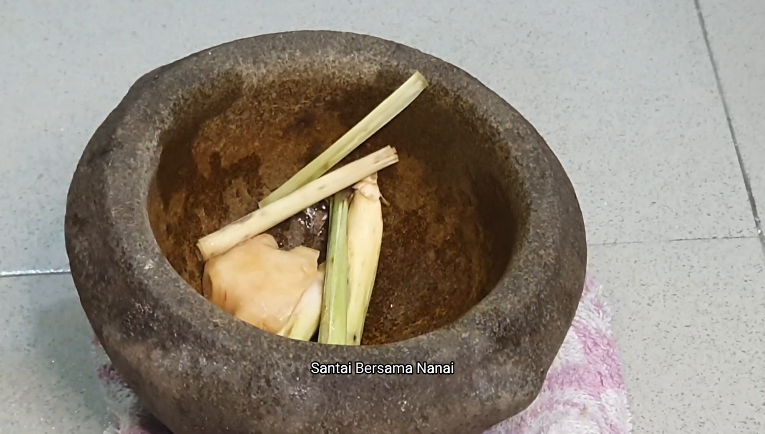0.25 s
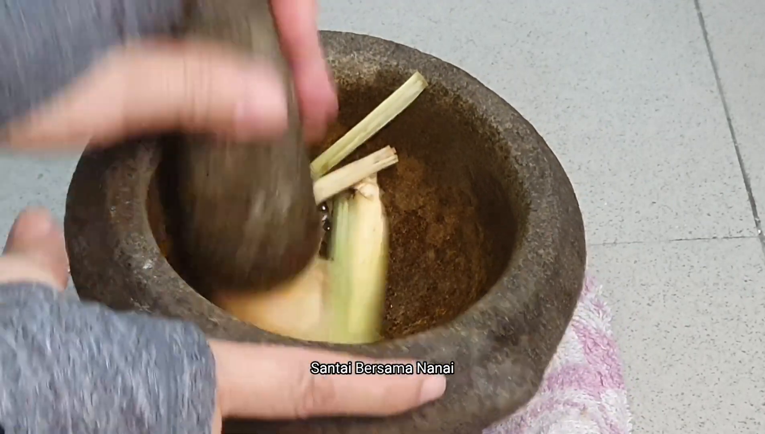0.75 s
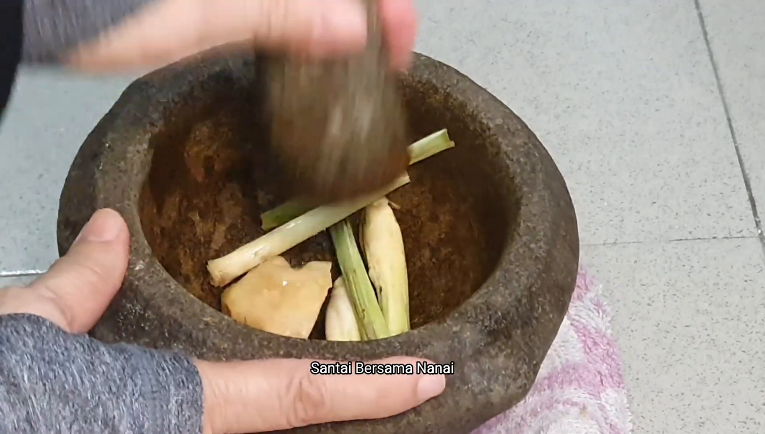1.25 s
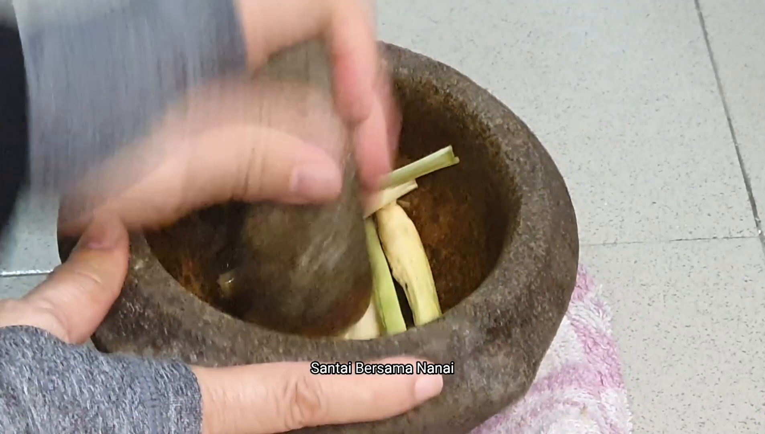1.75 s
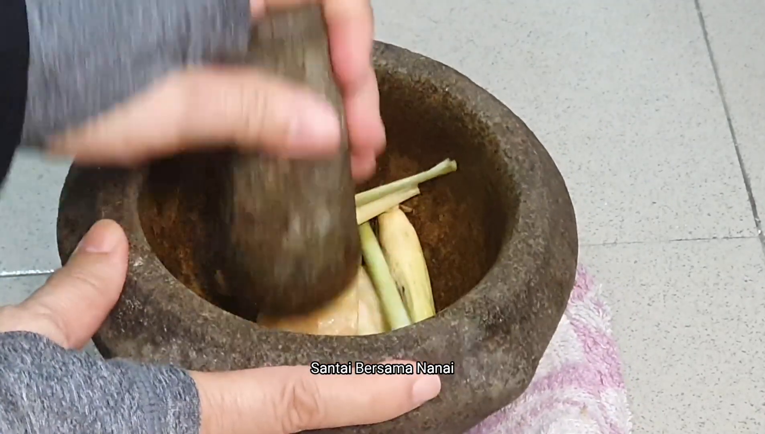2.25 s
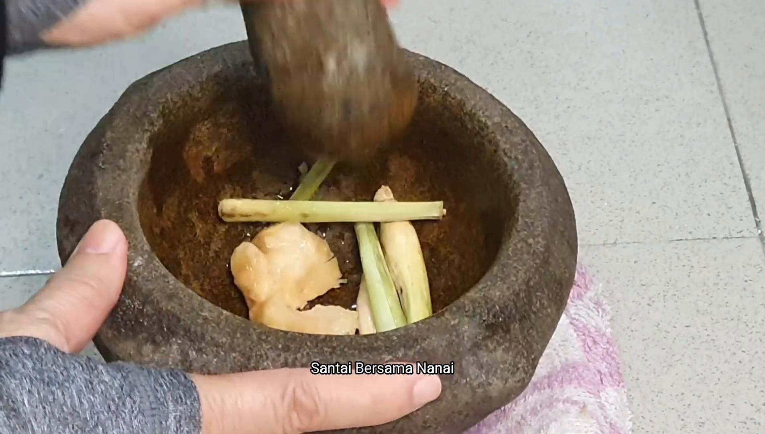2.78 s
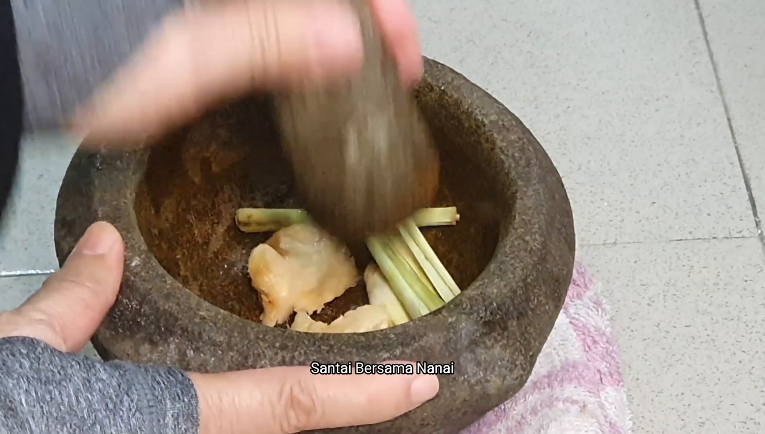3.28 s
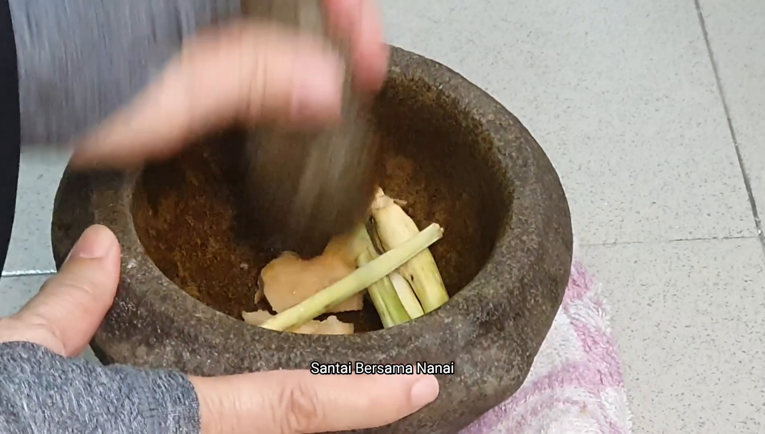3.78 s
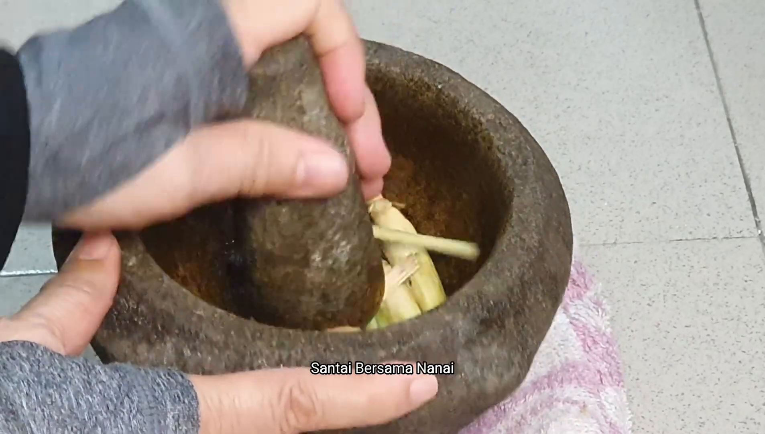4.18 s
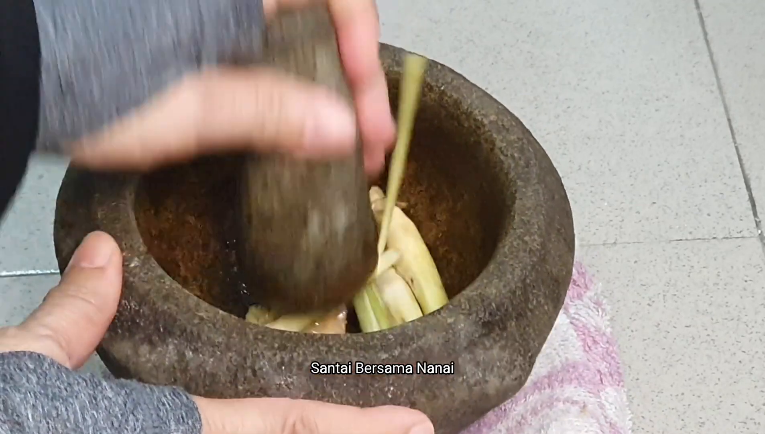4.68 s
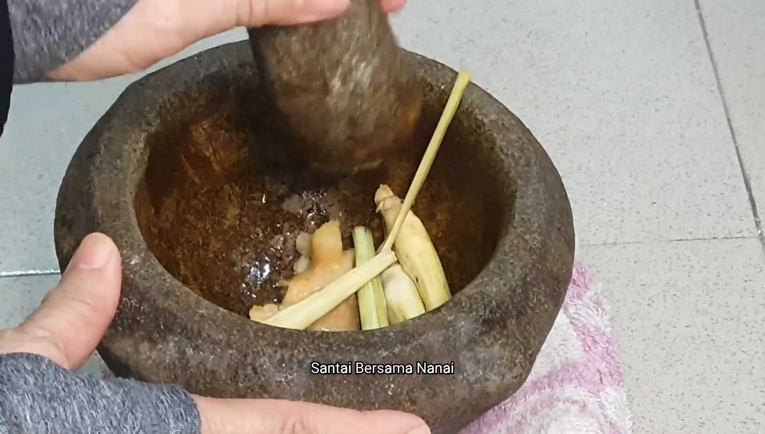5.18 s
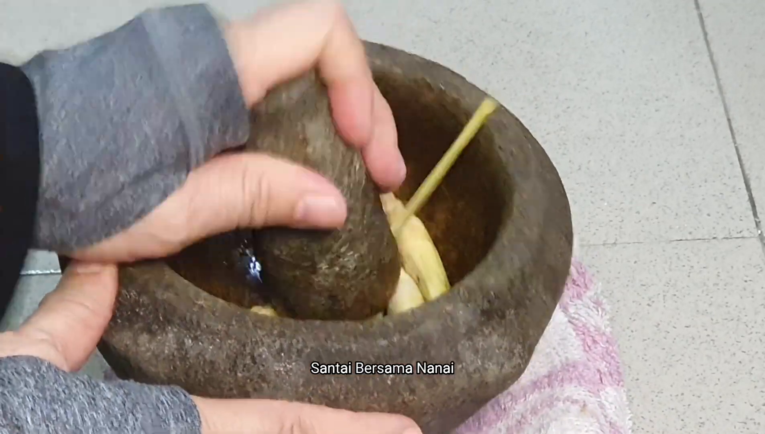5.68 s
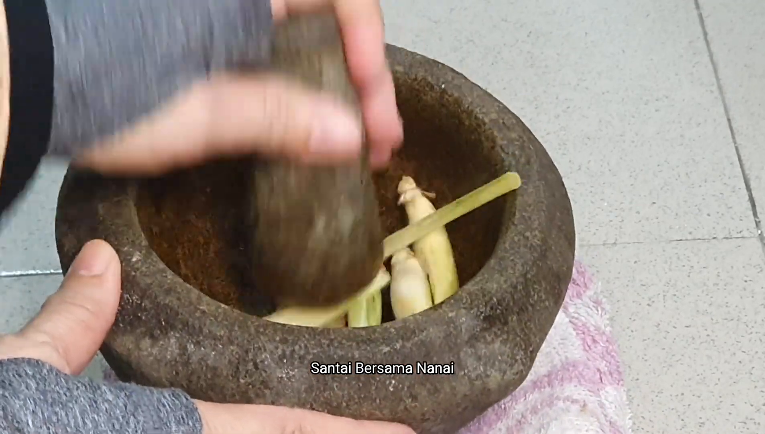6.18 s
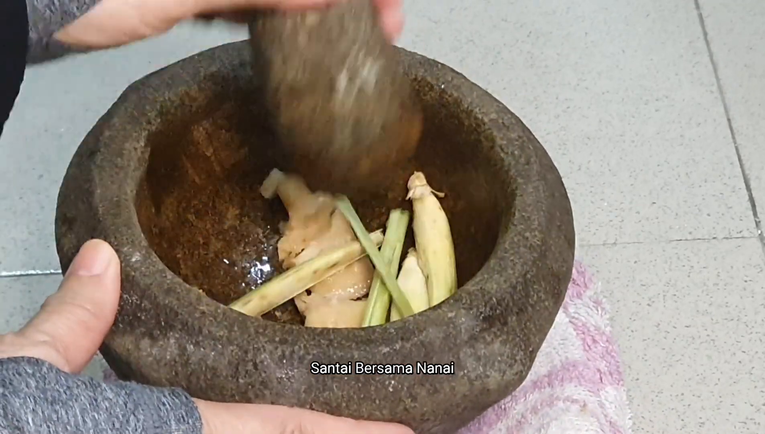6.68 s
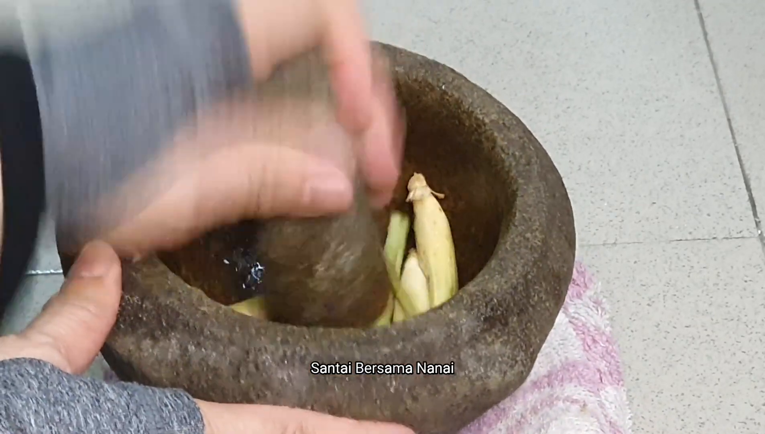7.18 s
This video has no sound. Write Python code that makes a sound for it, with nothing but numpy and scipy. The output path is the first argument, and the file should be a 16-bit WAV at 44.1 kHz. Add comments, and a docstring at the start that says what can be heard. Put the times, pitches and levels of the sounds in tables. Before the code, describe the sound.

A heavy stone pestle pounds fibrous ginger and lemongrass in a stone mortar, soft damp crunches and a few sharp loud knocks over low hum.

```python
"""A low rumble, a hum of appliances and a soft wash come first; then a stone pestle pounds ginger and lemongrass.
The blows land in a stone mortar on a tiled kitchen floor: each is a cluster of clicks as fibres are crushed.
Where stone meets stone, a short knock sets off dying sines: bowl, rim, pestle and the gap under it.
The hard room answers with wall echoes and a fading tail; two microphones a hand apart hear it all.
The background is shaped noise and steady tones; a limiter holds down the hardest knocks."""
import sys
import numpy as np
from scipy import signal
from scipy.fft import rfft, irfft
from scipy.io import wavfile
from scipy.ndimage import uniform_filter1d, minimum_filter1d

SR = 44100
rng = np.random.default_rng(int(sys.argv[2]) if len(sys.argv) > 2 else 0)


def digitize_waveform(pressure):
    """Quantize a signal to 16-bit integers and store it at the path in sys.argv[1].

    Rows of a 2-D input are taken as channels; values are limited to [-1, 1].
    """
    field = np.atleast_2d(pressure).T
    bounded = np.clip(field, -1, 1)
    quanta = np.round(bounded * 32767).astype(np.int16)
    wavfile.write(sys.argv[1], SR, quanta)


N = 328545
BLOW_SIZE = 4096  # samples in the sound of one blow
LEAD_S = 0.03  # swell ahead of each blow


def gain_of(db):
    """Turns decibels into an amplitude factor."""
    return 10 ** (np.asarray(db) / 20)


def to_unit_rms(x):
    """Scales a sound so that its average strength (rms) is 1."""
    return x / np.sqrt(np.mean(x ** 2) + 1e-20)


def read(points, hz):
    """Reads a table at hz, drawing straight lines on a log-frequency axis."""
    point_hz, value = np.transpose(points)
    return np.interp(np.log(hz + 1), np.log(point_hz + 1), value)


def add(mix, start_s, sound):
    """Mixes a sound in at a start time."""
    part = mix[:, round(start_s * SR):][:, :sound.shape[1]]
    part += sound[:, :part.shape[1]]


def partly_alike(left, other, likeness):
    """Makes a right side that shares the given part of the left one, per frequency."""
    same = np.clip(likeness, -1, 1)[:, None]
    return same * left + np.sqrt(1 - same ** 2) * other


def ring(hz, t60, db, t):
    """A dying sine: it loses 60 dB in t60 seconds."""
    return gain_of(db - 60 * t / t60) * np.sin(2 * np.pi * hz * t)


def struck(modes, t):
    """Sum of dying sines; neighbouring modes start in opposite directions."""
    return sum((-1) ** k * ring(hz, t60, db, t) for k, (hz, t60, db) in enumerate(modes))


def fuzzy_tone(hz, width):
    """Slow noise moved up to a pitch gives a wavering tone, rms 1; more width [Hz] is fuzzier."""
    slow = rng.standard_normal(N) + 1j * rng.standard_normal(N)
    r = np.exp(-np.pi * width / SR)
    for _ in range(2):
        slow = signal.lfilter([1], [1, -r], slow)
    carrier = np.exp(2j * np.pi * hz * np.arange(N) / SR)
    return to_unit_rms((slow * carrier).real)


# How the background drifts, for the wash and the hum:
# (time [s], swell of rumble and low wash before its follow factor [dB], hum level [dB],
#  third harmonic level [dB])
BACKGROUND_DRIFT = [(0.0, -1.5, -50.5, -59.5), (1.04, 0.5, -55, -63.5), (1.16, 3, -50, -58.5),
                    (1.41, -2.5, -71, -62.5), (1.66, 7, -52.5, -59.5), (1.82, 4, -38.5, -53.5),
                    (1.95, 9, -63, -49.5), (2.09, 0.5, -49, -56.5), (2.68, 1, -61.5, -58.5),
                    (2.9, 1, -50, -56), (3.67, -2, -48, -56), (3.98, -6, -62.5, -56.5),
                    (4.2, -2.5, -48, -57), (4.38, -4, -49, -62.5), (5.52, -0.5, -47, -53.5),
                    (7.16, -2, -51.5, -56), (7.3, -2.5, -56.5, -60), (7.45, -0.5, -64, -60)]
# Colour of the wash: (frequency [Hz], relative level per Hz [dB])
WASH_COLOUR = [(20, -30), (40, -26.5), (90, -5), (140, -14), (240, -16), (350, -11.5), (480, -14.5),
               (700, -14.5), (1100, -16), (1500, -22), (3260, -34), (7480, -49), (10000, -60), (12200, -68)]
# How alike the wash is at both microphones: (frequency [Hz], left-right likeness [-1 to 1])
WASH_LIKENESS = [(40, .97), (130, .88), (270, .61), (580, -.1), (1230, -.35), (2610, -.08), (5540, .02),
                 (11800, -.04)]
WASH_DB, WASH_FOLLOW = -48, 0.77  # rms level over both sides; share of the swell


def air():
    """Steady wash of the house: coloured noise, alike at both microphones only in the bass; its lows swell."""
    frames, hz = N // 256 + 5, np.fft.rfftfreq(1024, 1 / SR)
    a, b, c, d, patches = rng.standard_normal((frames, 513, 5)).T
    # blurred noise: patches of time and pitch a little louder or softer
    patches = to_unit_rms(uniform_filter1d(uniform_filter1d(patches, 12, 0), 14, 1))
    left = a + 1j * b
    z = np.array([left, partly_alike(left, c + 1j * d, read(WASH_LIKENESS, hz))])
    drift_s, drift_db = np.transpose(BACKGROUND_DRIFT)[:2]
    swell_db = WASH_FOLLOW * np.interp(np.arange(frames) * 256 / SR, drift_s, drift_db)
    low_swell_db = swell_db / (1 + (hz[:, None] / 500) ** 4)
    z *= gain_of(read(WASH_COLOUR, hz)[:, None] + 1.2 * patches + low_swell_db)
    wash = signal.istft(z, nperseg=1024, noverlap=768)[1][:, :N]
    return gain_of(WASH_DB) * to_unit_rms(wash)


# Peaks of the rumble: (frequency [Hz], width [Hz], relative level [dB])
RUMBLE_PEAKS = [(44, 9.2, 1), (70.2, 12, 2)]
HUM_HZ = 99.96
RUMBLE_DB, RUMBLE_FOLLOW = -53.5, 0.85  # level before the swell; share of the swell


def hum():
    """A wavering mains hum, its clean third harmonic, two fainter tones and a lumpy rumble below."""
    t = np.arange(N) / SR
    drift_s, *columns = np.transpose(BACKGROUND_DRIFT)
    swell_db, first_db, third_db = (np.interp(t, drift_s, c) for c in columns)
    rumble = to_unit_rms(sum(gain_of(db) * fuzzy_tone(hz, width) for hz, width, db in RUMBLE_PEAKS))
    rumble = rumble * gain_of(RUMBLE_DB + RUMBLE_FOLLOW * swell_db)
    tone = np.sqrt(2) * np.sin(2 * np.pi * HUM_HZ * t)
    first = gain_of(first_db) * to_unit_rms(tone + 0.42 * fuzzy_tone(97, 10))
    third = gain_of(third_db) * np.sqrt(2) * np.sin(2 * np.pi * 3 * HUM_HZ * t)
    faint = gain_of(-63.5) * fuzzy_tone(240, 4.4) + gain_of(-67.0) * fuzzy_tone(200, 2.3)
    # the hum reaches the microphones unevenly
    apart = gain_of(first_db - 9.5) * fuzzy_tone(90, 30) * [[1], [-1]]
    low = (rumble + first) * gain_of([[-0.3], [0.3]])
    return apart + low + third * gain_of([[0.4], [-0.4]]) + faint


# Wall echoes: (delay [s], left level [dB], right level [dB])
WALL_ECHOES = [(.0104, -8, -11), (.0132, -12, -14), (.021, -17, -17), (.0305, -13, -14)]
# How long the room's tail lasts: (frequency [Hz], time to fall 60 dB [s])
TAIL_TIMES = [(300, 0.44), (1000, 0.58), (2000, 0.44), (4000, 0.52), (7000, 0.38), (11000, 0.41)]
# How alike the tail is on both sides: (frequency [Hz], left-right likeness [-1 to 1])
TAIL_LIKENESS = [(130, .85), (300, 0.52), (600, 0.24), (1100, -0.5), (2300, -0.22), (5000, -.05),
                 (11800, 0.096)]


def kitchen():
    """Reply of the hard room: a few wall echoes over sparse random taps that die band by band."""
    size = SR * 3 // 4
    taps = np.zeros((2, size))
    # one tap, up or down, at a random place in every 12 samples
    at = np.arange(0, size - 12, 12) + rng.integers(0, 12, (2, (size - 1) // 12))
    np.put_along_axis(taps, at, rng.choice([-1., 1.], at.shape), 1)
    hz, t, z = signal.stft(taps, SR, nperseg=256)
    z[1] = partly_alike(z[0], z[1], read(TAIL_LIKENESS, hz))
    z = z * gain_of(-60 * t / read(TAIL_TIMES, hz)[:, None])
    tail = signal.istft(z, SR, nperseg=256)[1][:, :size]
    tail *= np.clip((np.arange(size) / SR - 0.003) / 0.0039, 0, 1)  # reflections thicken
    tail *= gain_of([[-0.5], [-1.5]]) / np.linalg.norm(tail[0])
    for delay_s, left_db, right_db in WALL_ECHOES:
        tail[:, round(delay_s * SR)] += gain_of([left_db, right_db])
    return tail


# The mortar shoved against the cloth:
# (frequency [Hz], time to fall 60 dB [s], relative level at the microphones [dB], into the room [dB])
THUD_MODES = [(430, 0.0081, 4, 5), (169, 0.018, -23, -32)]
THUD_DB = -23.5  # relative to the knock


def cloth_thud(knock_db, column, after):
    """The shoved mortar gives a low thud: dying sines that grow with the knock."""
    return struck([(m[0], m[1], m[column] + THUD_DB + knock_db) for m in THUD_MODES], after)


# The hollow of the bowl, which damps fast:
# (factor on bowl pitch, time to fall 60 dB [s], relative level [dB])
BOWL_MODES = [(1.034, 0.0083, -0.95), (1.37, 0.0024, -2.5), (0.21, 0.017, -21), (1.44, 0.0073, -19),
              (0.97, 0.035, -18.5), (0.585, 0.0074, -12), (0.775, 0.0056, -14)]
# The rim: (frequency [Hz], time to fall 60 dB [s], relative level at the microphones [dB],
#  into the room [dB])
RIM_MODES = [(939, 0.052, -21, -13), (1041, 0.041, -24, -8.5), (1079, 0.042, -35.5, -15.5),
             (848, 0.049, -24.5, -14.5), (623, 0.017, -15, -13), (1154, 0.048, -33, -15)]
# The pestle: (frequency [Hz], time to fall 60 dB [s], relative level at the microphones [dB],
#  into the room [dB])
PESTLE_MODES = [(3610, 0.0078, -9.5, -12), (3944, 0.059, -20.5, -13), (4040, 0.042, -22, -16),
                (4340, 0.0096, -17, -11.5), (4450, 0.0038, -11, -14.5)]
LOW_BOWL_FOLLOW = 0.33  # the low modes of the bowl wake with the rim
GAP_HZ, GAP_T60_S = 3140, 0.0096
GAP_STRUCK_DB = (-11, -19.5)  # the knock rings the gap too: at the microphones, into the room


def stone_ring(bowl_hz, rim_db, pestle_db, gap_db, column, t):
    """Ring of the bowl, rim, pestle and the gap under it: each stone shakes in several dying sines."""
    bowl = [(bowl_hz * factor, t60, db + (factor < 0.8) * LOW_BOWL_FOLLOW * rim_db)
            for factor, t60, db in BOWL_MODES]
    stones = struck(bowl, t)
    stones += struck([(m[0], m[1], m[column] + rim_db) for m in RIM_MODES], t)
    stones += struck([(m[0], m[1], m[column] + pestle_db) for m in PESTLE_MODES], t)
    return stones - ring(GAP_HZ, GAP_T60_S, GAP_STRUCK_DB[column - 2] + gap_db, t)


# Colour of the snapping fibres: (frequency [Hz], relative level [dB])
FIBRE_COLOUR = [(300, -11.5), (1000, -7.5), (2200, -5.5), (3500, 2.5), (6000, 8), (8000, 5), (10500, -3),
                (12000, -21)]
EVENED_SHARE = 0.55  # of the crunch that reaches the walls, as a share of power


def crunch(length, tilt_db, rise, gap_db):
    """Fibres snap in uneven clicks that swell and thin out; the gap colours them. Rows: near, into the room."""
    t = np.arange(BLOW_SIZE) / SR - LEAD_S
    # a quick rise plus a slower, fainter one before the peak
    swell = 0.46 * np.exp(t / max(rise, 0.0003)) + 0.13 * np.exp(t / 0.0061)
    shape = np.where(t < 0, swell, np.exp(-t / max(length, 0.0005)))
    snaps = rng.standard_normal(BLOW_SIZE) * gain_of(1.56 * rng.exponential(1, BLOW_SIZE))
    hz = np.fft.rfftfreq(BLOW_SIZE, 1 / SR)
    colour = gain_of(read(FIBRE_COLOUR, hz) + tilt_db * np.log2((hz + 1500) / 8000))
    colour *= 1 + gain_of(gap_db) * 6 / (1 + ((hz - GAP_HZ) / 230) ** 2)
    # over all directions the snaps even out towards their mean colour: one coloured click
    click = np.arange(BLOW_SIZE) == round(LEAD_S * SR)
    sound = irfft(rfft([snaps * shape, click]) * colour)
    # both get the energy of 300 samples at rms 1
    near, even = sound / np.sqrt(np.mean(sound ** 2, 1, keepdims=True) * BLOW_SIZE / 300)
    return np.array([near, np.sqrt(EVENED_SHARE) * even + np.sqrt(1 - EVENED_SHARE) * near])


# Every blow of the pestle:
# (time [s], knock level before a fixed boost [dB], crunch level [dB], bowl pitch [Hz],
#  relative rim ring [dB], relative pestle ring [dB], crunch fade time constant [s],
#  crunch tilt [dB per doubling of frequency + 1500 Hz], relative gap ring [dB], room share [dB])
PESTLE_BLOWS = [(0.9645, -46, -52.5, 2067, -2, -18, 0.0055, -4, -25, -2),
                (1.285, -38, -52.5, 2000, 5, -28, 0.0044, 0, 1, -5.5),
                (1.6192, -34, -35, 2080, 8.5, -17, 0.0046, 4, 0, -6),
                (1.9665, -36, -35, 1860, 9, -7, 0.003, -3, -10, -3),
                (2.3245, -30.5, -29, 2240, 4.5, -0.5, 0.0018, 4.5, -18, -6.5),
                (2.7102, -22.5, -27, 1950, 3.5, -23, 0.0034, -6.5, -10, -5),
                (3.1186, -29.5, -34, 1970, 3, -43, 0.0033, -3, -13, -5.5),
                (3.562, 3.5, -13, 2040, 1.5, -3.5, 0.00084, -10.5, -8, -3.5),
                (4.014, -49, -58.5, 2180, -20, 3, 0.0066, 14, -11, 3.5),
                (4.045, -2.5, -82, 1934, 0.5, -16, 0.003, -7, -14, -11),
                (4.3455, -45, -53, 1970, -8, -15, .0031, -2, -12, -9),
                (4.3524, -57, -50.5, 2180, 0, -17, 0.0051, 2.5, -1.5, -2),
                (4.3588, -42.5, -57, 1890, -11, -17, 0.0047, 15, 0.1, -10),
                (4.7227, -46, -52, 1970, -12, -10, 0.0057, 3, -2, 3.5),
                (4.7292, -46, -44.5, 1940, -6, -11, 0.006, -2.5, -26, -12),
                (5.1103, -45, -40.5, 2080, -8, -18, 0.01, -1.5, -12, -5.5),
                (5.4943, -22.5, -30, 1930, 2.5, -32, 0.005, -0.5, -32, -6.5),
                (5.8725, -44, -47, 1950, -17, -25, 0.0035, -3, 4, -1),
                (5.8798, -29.5, -33, 1770, -15, -45, 0.0038, 0, -5.5, -4.5),
                (6.2667, -48, -51, 2100, -8, -7, .0024, -4, -11, 2),
                (6.2754, -43, -42.5, 1840, -6, -2, 0.0039, -5.5, -29, -2),
                (6.602, -48, -57, 1980, -12, -23, .003, -3, -9, 8),
                (6.618, -51, -49, 1780, -8, -20, .0033, -3, -15, 0),
                (6.652, 1.5, -25.5, 2027, -4, -0.5, 0.0047, -12.5, -10, -7.5),
                (7.0285, -38, -48.5, 1870, -13, -15, 0.0071, 2, 1.5, -3.5),
                (7.399, -29.5, -34.5, 1900, -17, -20, 0.0034, 7.5, -2, -6)]
RISE_SHARE = 0.51  # time constant of the crunch's quick rise, as a share of its fade
PAN_DB, PAN_PER_KNOCK_DB = 2.5, -0.1375  # hard knocks sound nearer the middle, soft ones from the left


def pounding():
    """Every blow: crunch, grating and a knock that rings the stones, heard straight and through the room."""
    mix, rooms = np.zeros((2, N)), [kitchen() for _ in range(4)]
    t = np.arange(BLOW_SIZE) / SR
    after = np.maximum(t - LEAD_S, 0)
    small = signal.butter(3, 800, "high", fs=SR, output="sos")  # objects this small radiate no bass
    strike = np.arange(BLOW_SIZE) == round((LEAD_S - 0.0007) * SR)
    for k, blow in enumerate(PESTLE_BLOWS):
        time_s, knock_db, crunch_db, bowl_hz, rim_db, pestle_db, length, tilt_db, gap_db, wet_db = blow
        # the stones touch too long to ring high; a blow that rings the pestle is the briefer one
        contact_hz = np.clip(5113 + 45 * pestle_db, 3000, 8000)
        contact = signal.butter(6, contact_hz, fs=SR, output="sos")
        fibres = gain_of(crunch_db) * crunch(length, tilt_db, RISE_SHARE * length, gap_db)
        # snaps shake the stone too
        push = gain_of(knock_db + 4.0) * strike + gain_of(-23) * fibres[0]
        force = signal.sosfilt(contact, push)
        # rough faces grate
        grit = gain_of(knock_db - 10.5) * rng.standard_normal(BLOW_SIZE)
        grit *= (after > 0) * np.exp(-after / 0.00093)
        fibres = fibres + signal.sosfilt(contact, grit)
        heard = []
        for column in (2, 3):  # at the microphones, into the room
            stones = stone_ring(bowl_hz, rim_db, pestle_db, gap_db, column, t)
            knock = signal.fftconvolve(force, stones)[:BLOW_SIZE]
            thud = cloth_thud(knock_db, column, after)
            heard.append(thud + signal.sosfilt(small, fibres[column - 2] + knock))
        near, far = heard
        start_s = time_s + 0.0012 - LEAD_S  # a blow peaks just after its onset
        pan_db = PAN_DB + PAN_PER_KNOCK_DB * knock_db
        straight = np.array([near, np.roll(near, 3)])  # right side 3 samples later
        add(mix, start_s, straight * gain_of([[pan_db / 2], [-pan_db / 2]]))
        reply = signal.fftconvolve(far[None], rooms[k % 4], axes=1)
        add(mix, start_s, gain_of(wet_db) * reply)
    return mix


def scene():
    """Blows over the background."""
    return pounding() + air() + hum()


def record(dry):
    """A limiter that looks ahead turns down the hardest knocks and lets go gradually; then the top is cut."""
    over_db = np.maximum(20 * np.log10(abs(dry).max(0) / 0.93 + 1e-9), 0)
    fall = np.arange(N) * 266.0 / SR  # regains 266 dB per second
    over_db = np.maximum(np.maximum.accumulate(over_db + fall) - fall, 0)
    # hold the largest cut nearby, then smooth it
    over_db = uniform_filter1d(-minimum_filter1d(-over_db, size=89), size=44)
    held = dry / gain_of(over_db)
    low_pass = signal.firwin(255, 12000, window=("kaiser", 9), fs=SR)  # cut at 12000 Hz
    return signal.oaconvolve(held, low_pass[None], "same")


dry = scene()
out = record(dry)
digitize_waveform(out)
```